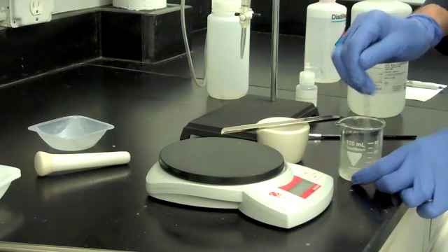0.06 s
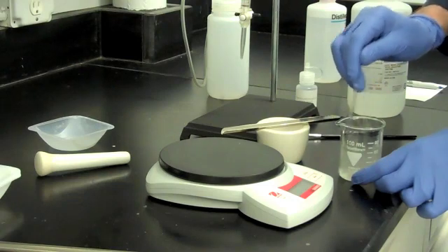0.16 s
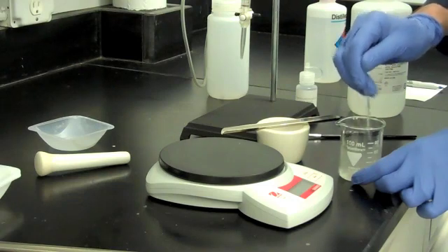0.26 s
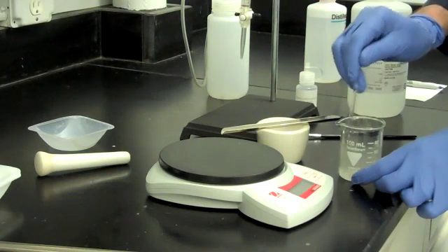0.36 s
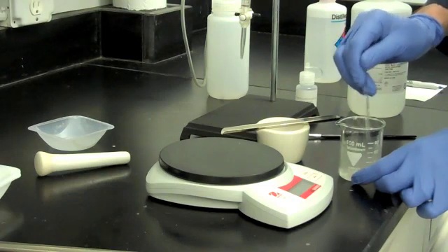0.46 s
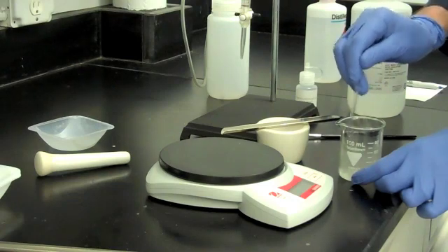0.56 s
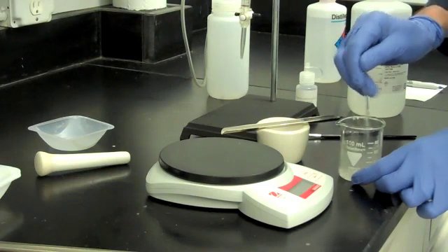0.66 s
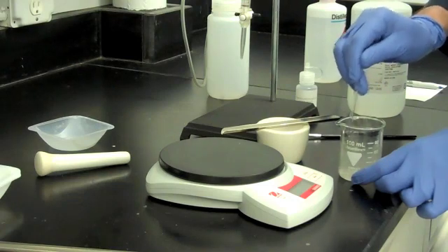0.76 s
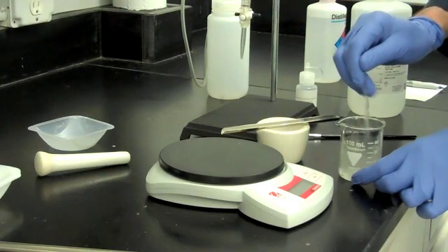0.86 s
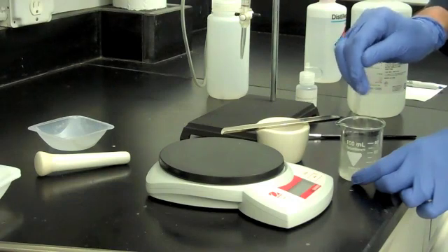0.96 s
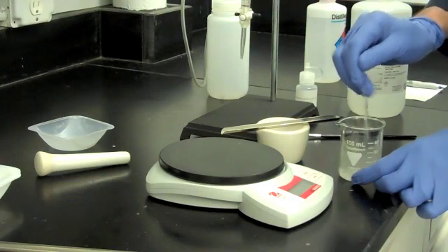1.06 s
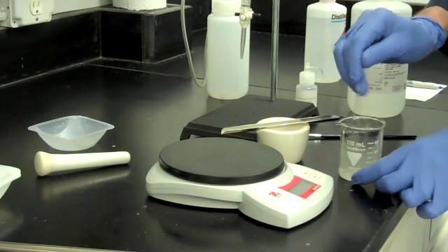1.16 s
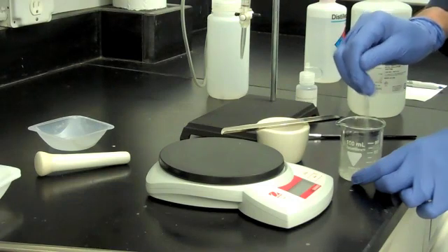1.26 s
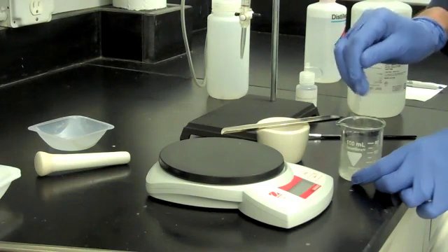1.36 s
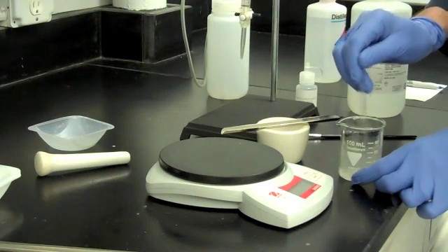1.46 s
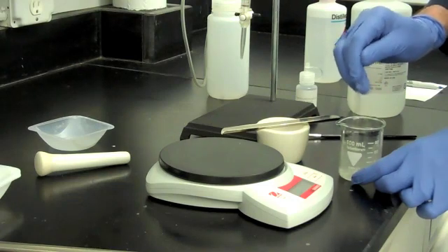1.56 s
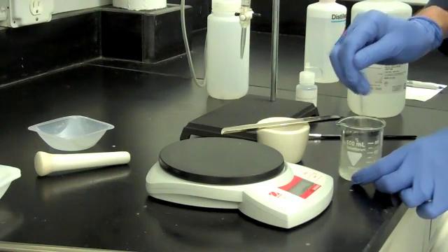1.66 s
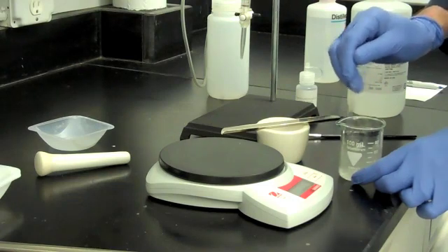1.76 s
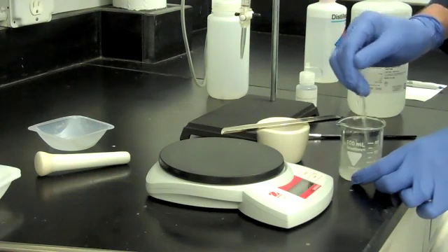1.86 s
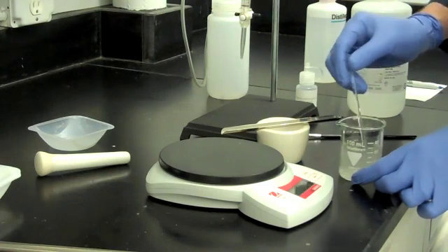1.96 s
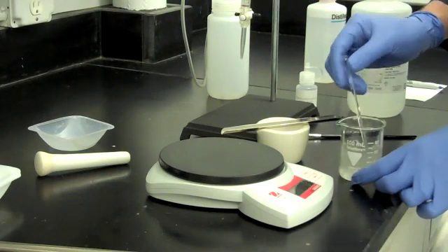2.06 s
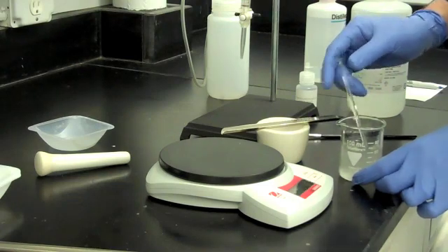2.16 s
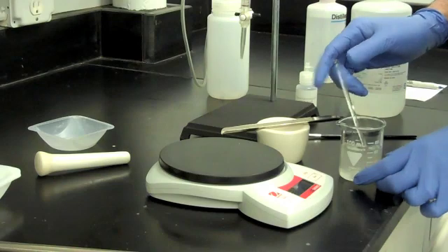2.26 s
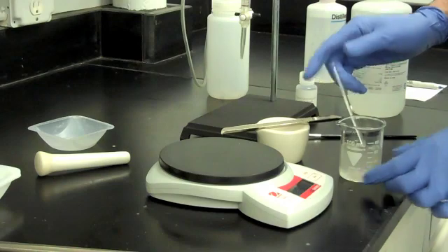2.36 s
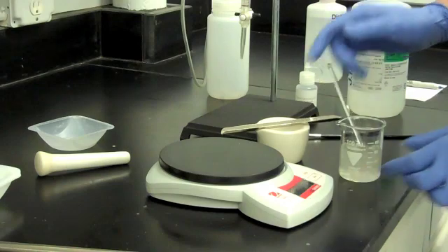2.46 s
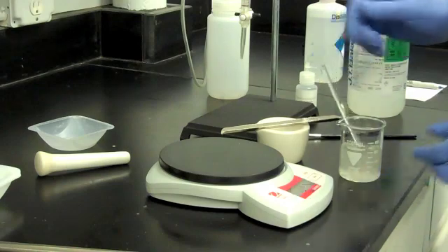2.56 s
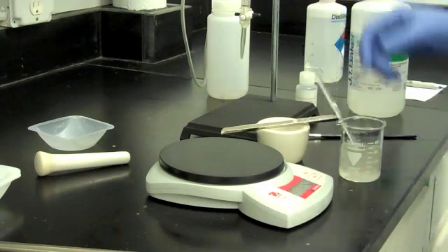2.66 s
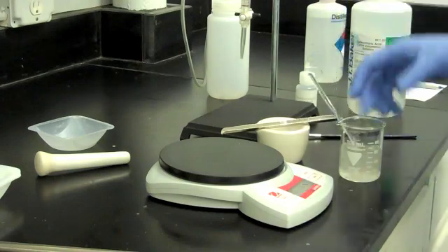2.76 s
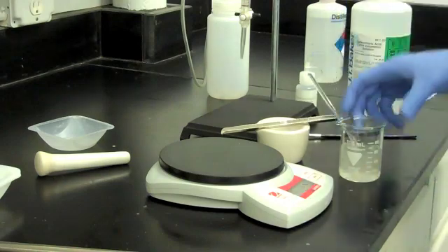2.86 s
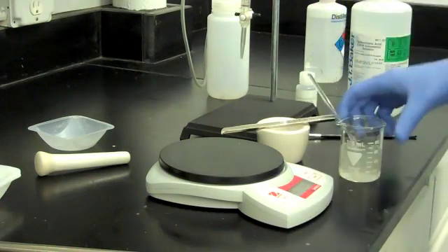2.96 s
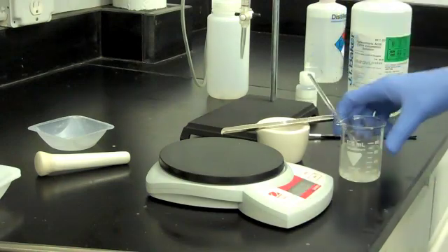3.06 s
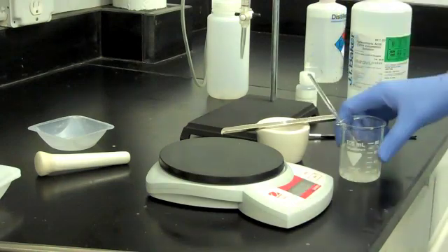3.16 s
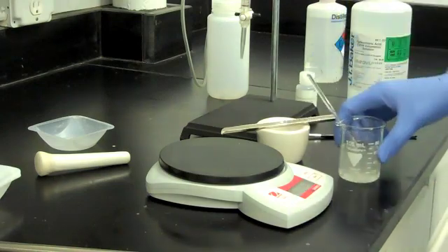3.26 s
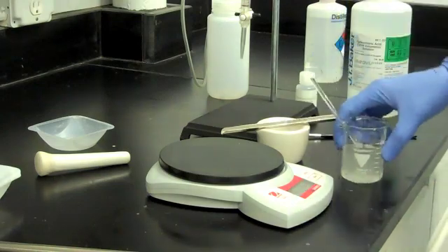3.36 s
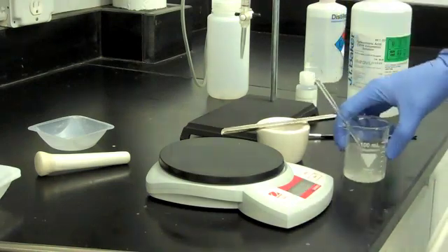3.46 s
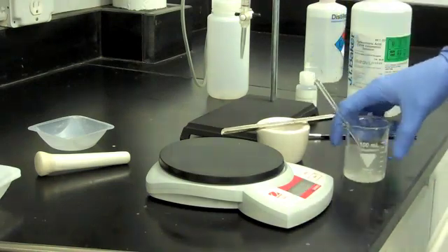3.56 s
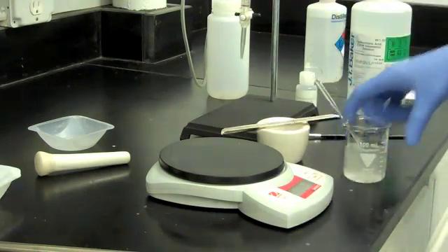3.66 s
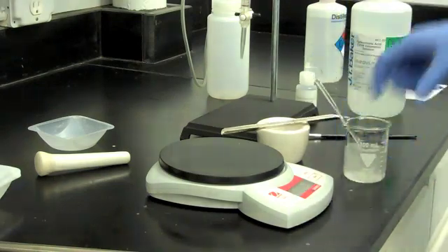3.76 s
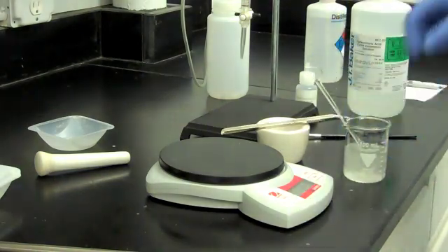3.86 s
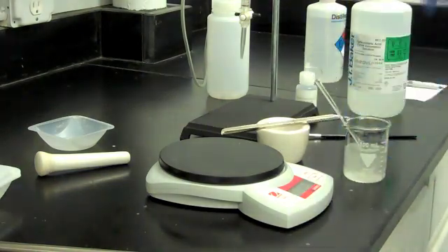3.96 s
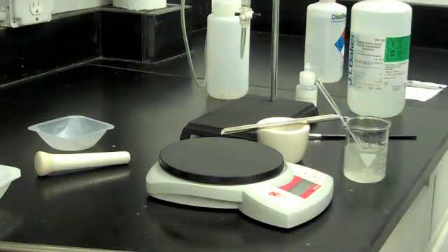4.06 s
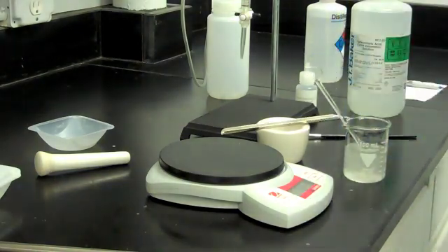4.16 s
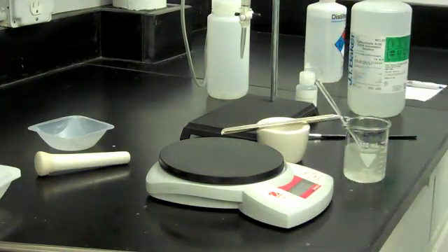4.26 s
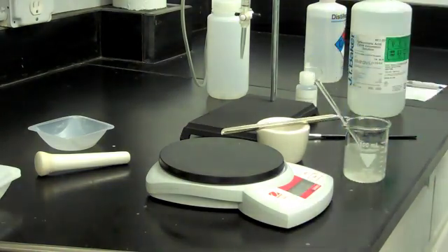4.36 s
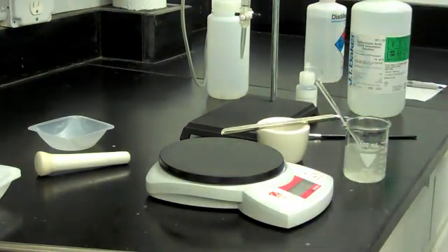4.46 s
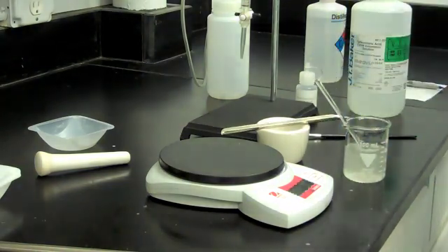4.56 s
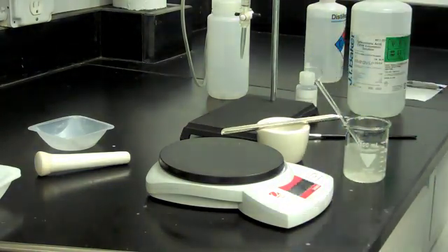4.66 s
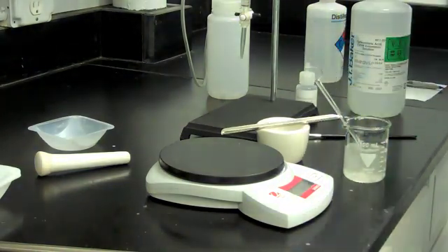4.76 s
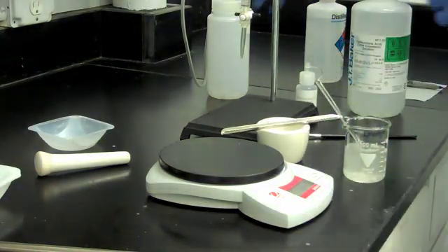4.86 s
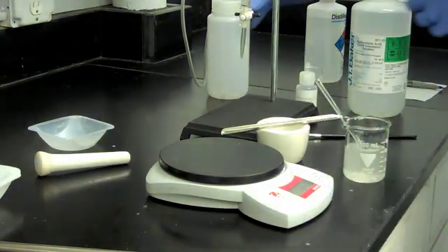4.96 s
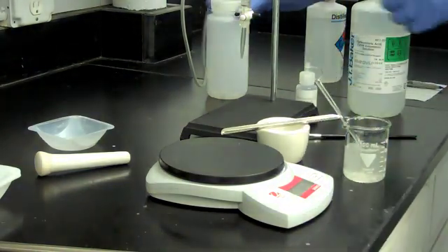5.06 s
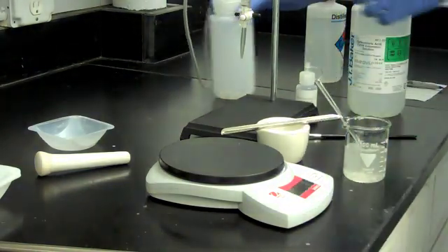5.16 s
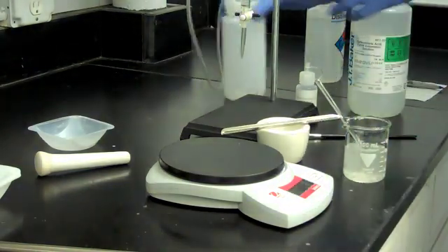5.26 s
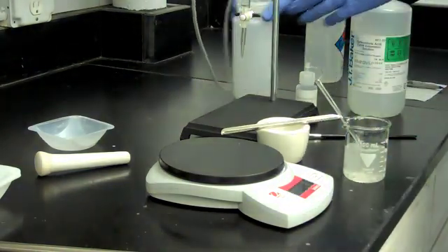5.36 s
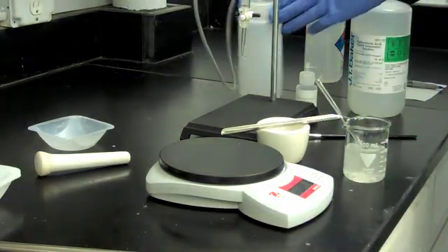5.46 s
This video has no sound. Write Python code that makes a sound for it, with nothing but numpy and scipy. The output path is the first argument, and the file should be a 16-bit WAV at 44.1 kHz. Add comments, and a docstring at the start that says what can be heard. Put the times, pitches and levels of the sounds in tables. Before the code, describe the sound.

In a small hard lab room, a thin glass rod stirs liquid in a beaker with quick uneven bright clinks, a clear ringing note, small slaps and bubble blips. After about two seconds it is released, clattering briefly and sliding on the rim. The beaker is nudged over the bench, then sleeve rustle and a dull plastic bump follow. Ventilation hums steadily. The close stereo pickup leans left for the glass highs.

```python
"""Bright, quick clinks come first: a glass rod stirs liquid in a beaker, then is let go and slides on the rim.
Each clink is a noise tick and crack plus decaying sine modes; the beaker's own note sings on underneath.
Liquid slaps and bubbles; sticking and slipping glass excites the same modes as it scrapes and slides.
Later the beaker is nudged across the bench, a sleeve rustles as the arm reaches out, and a plastic bottle
is bumped, all in shaped noise. Ventilation noise and motor tones hum throughout in a small hard room."""
import sys
import numpy as np
from scipy import signal
from scipy.fft import rfft, irfft, next_fast_len
from scipy.io import wavfile
from scipy.ndimage import uniform_filter1d, map_coordinates

SR = 44100
rng = np.random.default_rng(int(sys.argv[2]) if len(sys.argv) > 2 else 0)


def to_wav(sig):
    """Store sig (one row per channel, or 1-D mono) as 16-bit WAV at the path in sys.argv[1].

    Samples outside -1..1 are clipped; the rate is SR.
    """
    pcm = np.clip(np.atleast_2d(sig), -1, 1) * 32767
    pcm = np.round(pcm).astype(np.int16)
    wavfile.write(sys.argv[1], SR, pcm.T)  # frames by channels


N = 243076
T = np.arange(N) / SR
HALF_S = T[:SR // 2]   # time axis of one short sound


def from_db(db):
    """Turn decibels into an amplitude factor."""
    return 10 ** (np.asarray(db) / 20)


def rms_one(x):
    """Scale a signal to rms 1."""
    return x / np.sqrt(np.mean(x ** 2) + 1e-20)


def at_hz(points, hz):
    """Read a spectrum on a log-frequency axis."""
    points = np.array(points)
    return np.interp(np.log(np.maximum(hz, 1)), np.log(points[:, 0]), points[:, 1])


def dying(t, t60):
    """Exponential decay that falls 60 dB in t60 seconds."""
    return np.exp(-np.log(1000) * t / t60)


def add(out, s, sound):
    """Mix a sound into out from time s on."""
    start = max(round(s * SR), 0)
    out[..., start:start + sound.shape[-1]] += sound[..., :N - start]


def wobble(rate, size=N):
    """Smooth random movement with about rate turns a second; spread about 1."""
    knots = rng.standard_normal(4096)
    return map_coordinates(knots, [T[:size] * rate], order=3, mode="wrap")


# Stereo width of all noise: [f/Hz, left-right likeness from -1 (opposed) to 1 (mono)]
STEREO_LIKENESS = [(30, 0.2), (130, 0.95), (600, 1), (1400, 0.2), (3000, 0.33), (7000, -0.21),
                   (15000, -0.18)]


def noise(spectrum, size=N):
    """Stereo noise of a given colour at rms 1, its left-right likeness set by frequency."""
    padded = next_fast_len(size)
    hz = np.fft.rfftfreq(padded, 1 / SR)
    mid, side = rfft(rng.standard_normal((2, padded)))
    alike = np.clip(at_hz(STEREO_LIKENESS, hz), -1, 1)
    both = np.sqrt(1 + alike) * mid + np.sqrt(1 - alike) * side * [[1], [-1]]
    coloured = irfft(both * from_db(at_hz(spectrum, hz)), padded)
    return rms_one(coloured[:, :size])


def tinted(x, spectrum, sides=1):
    """Apply a smooth gain curve; sides gives its share in each channel."""
    size = next_fast_len(x.shape[-1] + 256)
    curve_db = at_hz(spectrum, np.fft.rfftfreq(size, 1 / SR))
    gain = from_db(curve_db * np.array(sides))
    return irfft(rfft(x, size) * gain, size)[:, :x.shape[-1]]


def strokes(rows, attack_s, release_t60):
    """Level of rubbing strokes: each swells, holds for the rest of its length and dies away."""
    power = 0
    for s, length, db in rows:
        swell = np.sin(np.pi / 2 * np.clip((T - s) / attack_s, 0, 1))
        release = dying(np.clip(T - s - length, 0, 1), release_t60)
        power = power + (from_db(db) * swell * release) ** 2
    return np.sqrt(power)


def friction(spectrum, pressure, grain_db):
    """Rubbing noise, roughened by catches a few milliseconds long."""
    catches = rms_one(uniform_filter1d(rng.standard_normal(N), size=160))
    return noise(spectrum) * pressure * rms_one(from_db(grain_db * catches))


def ringing(modes, colour, ring, tuning=1, ear_lag_s=.00006, scatter=2.23):
    """One blow on a set of modes; the contact point gives each a chance strength and phase."""
    t, out = HALF_S, 0
    for hz, db, t60 in modes:
        chance_db = 2.2 * rng.standard_normal()
        gain = from_db(db + at_hz(colour, hz) + chance_db)
        # each blow's modes land slightly off pitch, by chance
        pitch = tuning * hz * (1 + 0.0011 * rng.standard_normal())
        # the right side hears it later, with a random phase scatter (rad)
        late = 2 * np.pi * hz * ear_lag_s + scatter * rng.standard_normal()
        turn = rng.uniform(0, 2 * np.pi) - np.array([[0], [late]])
        wave = 2 * np.pi * pitch * t
        swing = gain * dying(t, t60 * ring)
        out = out + np.cos(turn) * (swing * np.sin(wave)) + np.sin(turn) * (swing * np.cos(wave))
    return out


def sliding(pressure, modes, colour, ring, slips_per_s, tuning=1):
    """Glass on glass sticks and slips; the tiny slips excite the modes."""
    slips = (rng.random(N) < slips_per_s / SR) * rng.standard_normal(N)
    body = ringing(modes, colour, ring, tuning=tuning)
    body = body * (1 - np.exp(-HALF_S / .001))
    body = body / np.sqrt(np.sum(body ** 2) / 2)
    return signal.fftconvolve([rms_one(slips) * pressure], body, axes=1)[:, :N]


def lab(x, near_db=-11.5, near_t60=0.059, tail_db=-10.0, tail_t60=0.51, top_t60=0.19, split_hz=8500):
    """Quick reflections off bench and bottles, then a room tail whose top dies first."""
    t = T[:SR]
    flat = [(100, 0), (16000, 0)]
    near = noise(flat, size=SR) * dying(t, near_t60) * (t > .002)
    diffuse = noise(flat, size=SR) * (1 - np.exp(-t / 0.0051))
    low = signal.sosfilt(signal.butter(4, split_hz, "low", fs=SR, output="sos"), diffuse)
    top = signal.sosfilt(signal.butter(4, split_hz, "high", fs=SR, output="sos"), diffuse)
    tail = low * dying(t, tail_t60) + top * dying(t, top_t60)
    echoes = from_db(near_db) * rms_one(near) + from_db(tail_db) * rms_one(tail)
    return x + signal.fftconvolve(x, echoes / np.sqrt(SR), axes=1)[:, :N]


# Colour of the broad air noise: [f/Hz, relative level/dB]
AIR_COLOUR = [(15, -45.5), (25, -14), (58, -18), (102, -8.5), (188, 1.5), (407, -6), (441, -2), (477, -0.5),
              (622, -8), (730, -4), (903, -4), (1120, -7), (3150, -17.5), (7760, -21), (14300, -29)]
# Colour of the thin hiss: [f/Hz, relative level/dB]
HISS_COLOUR = [(3000, -42), (5500, -6), (7600, 7), (8800, -2), (11000, -8.5), (11900, 3.5), (12600, -22),
               (15000, -19)]
# Top-end roll-off of air and hiss: [f/Hz, level/dB]
AIR_ROLLOFF = [(14100, 0), (14700, -30)]
# Motor tones before their waver: [f/Hz, rms level/dB]
MOTOR_TONES = [(120, -79), (199.2, -67.5), (398.4, -69), (479.5, -61.5), (600, -69.5), (720.5, -68),
               (839.8, -64), (959, -67)]


def ventilation(air_db=-54.0, hiss_db=-63.0, waver=0.34):
    """Steady air noise, a thin hiss and motor tones that drift slightly in level and phase."""
    air = from_db(air_db) * noise(AIR_COLOUR)
    hiss = from_db(hiss_db) * noise(HISS_COLOUR)
    out = tinted(air + hiss, AIR_ROLLOFF)
    for hz, db in MOTOR_TONES:
        swell, phase = waver * signal.resample(rng.standard_normal((2, 24)), N, axis=1)
        tone = np.sin(2 * np.pi * (hz * T + rng.random()) + phase)
        out += np.sqrt(2) * from_db(db) * (1 + swell) * tone
    return out


# Strokes of sleeve and glove: [t/s, length/s, rub level/dB, swish level/dB]
RUSTLE_STROKES = [(4.391, 0.041, -52.5, -42.5), (4.828, 0.04, -41.5, -54.5), (4.952, 0.061, -45.5, -48.5),
                  (4.999, 0.077, -44.5, -46), (5.294, 0.044, -52, -44.5), (5.447, 0.045, -59, -48)]
# Colour of the darker cloth rub: [f/Hz, relative level/dB]
RUB_COLOUR = [(250, -14), (600, -3.5), (1500, -0.5), (1950, -0.5), (2400, -1.5), (3300, -2), (5000, -11.5),
              (12000, -47)]
# Colour of the brighter cloth swish: [f/Hz, relative level/dB]
SWISH_COLOUR = [(1000, -38), (2800, -8.5), (5200, -3.5), (6400, -1.5), (7500, 2.5), (9000, -6),
                (12000, -13.5), (15000, -30)]
# Glass base dragged on the bench: [t/s, length/s, level/dB]
BASE_DRAGS = [(3.13, 0.36, -57.5), (3.32, 0.072, -51), (3.5, 0.073, -51)]
# Colour of dragged glass: [f/Hz, relative level/dB]
BASE_DRAG_COLOUR = [(300, -22), (900, 7.5), (1500, 9), (2800, -7), (4500, -21), (8000, -35), (14000, -31)]
# Dull bumps on the bench: [t/s, level/dB, t60/s]
BENCH_BUMPS = [(3.515, -44, 0.14), (4.453, -40.5, 0.11), (5.254, -31, 0.12), (5.295, -44.5, 0.39)]
# Colour of a bump: [f/Hz, relative level/dB]
BUMP_COLOUR = [(30, -45), (70, -23), (170, 5.5), (330, 2.5), (600, 7.5), (920, 2.5), (1300, -7.5),
               (3000, -12.5), (7000, -21), (14000, -37)]


def handling(reach_start_s=3.93, reach_rise_s=0.91, reach_rub_db=-57, reach_swish_db=-53.5):
    """Cloth and dragged glass as friction noise, soft bumps as short decaying noise."""
    # the cloth's whisper grows as the arm reaches out, then stays
    reach = np.clip((T - reach_start_s) / reach_rise_s, 0, 1)
    start, length, rub_db, swish_db = np.transpose(RUSTLE_STROKES)
    rub = strokes(zip(start, length, rub_db), attack_s=0.032, release_t60=0.11)
    swish = strokes(zip(start, length, swish_db), attack_s=0.032, release_t60=0.11)
    out = friction(RUB_COLOUR, np.hypot(rub, reach * from_db(reach_rub_db)), grain_db=1.0)
    out += friction(SWISH_COLOUR, np.hypot(swish, reach * from_db(reach_swish_db)), grain_db=1.0)
    drag = strokes(BASE_DRAGS, attack_s=0.11, release_t60=0.3)
    out += friction(BASE_DRAG_COLOUR, drag, grain_db=3.0)
    t = HALF_S
    soft = np.sin(np.pi / 2 * np.minimum(t / .006, 1)) ** 2
    for s, db, t60 in BENCH_BUMPS:
        add(out, s, from_db(db) * noise(BUMP_COLOUR, size=len(t)) * soft * dying(t, t60))
    return out


# Faint squeaks of wet glass and rubber glove: [t/s, centre f/Hz, level/dB, length/s]
GLOVE_SQUEAKS = [(2.71, 2584, -48.5, 0.11), (4.401, 4820, -44, 0.05), (4.414, 5580, -40.5, .04),
                 (4.48, 4850, -58.5, 0.32), (4.6, 3720, -62, .17), (4.965, 1886, -42.5, 0.071)]


def squeaks(jitter=0.063):
    """Rubber slips at an unsteady rate, heard as short tones of jittering pitch."""
    out = np.zeros((2, N))
    for s, hz, db, length in GLOVE_SQUEAKS:
        swell = np.hanning(round(length * SR))
        pitch = hz * (1 + jitter * wobble(391, size=len(swell)))
        add(out, s, from_db(db) * swell * np.sin(2 * np.pi * np.cumsum(pitch) / SR))
    return out


# Liquid slapping the wall: [t/s, level/dB, t60/s]
WALL_SLAPS = [(.23, -47, 0.28), (.306, -34.5, 0.3), (.45, -42, 0.31), (1.372, -42, 0.047),
              (1.413, -41, 0.32), (1.645, -44.5, 0.75), (1.869, -40.5, 0.48), (3.517, -36, 0.096)]
# Colour of a slap: [f/Hz, relative level/dB]
SLAP_COLOUR = [(250, -17.5), (600, -1), (900, 0), (1250, 5), (1550, -1), (1950, 1.5), (2600, -3),
               (5000, -44)]
# Bubbles pulled under by the rod: [t/s, starting f/Hz, level/dB, t60/s]
RISING_BUBBLES = [(.299, 2073, -26.5, 0.064), (.307, 1876, -22.5, 0.085), (.696, 2140, -33, 0.057),
                  (1.463, 1980, -21, 0.028), (1.478, 1850, -31, 0.057)]


def liquid(rise=0.93):
    """Slaps of liquid, and bubbles whose pitch rises as they near the surface."""
    out, t = np.zeros((2, N)), HALF_S
    for s, db, t60 in WALL_SLAPS:
        slap = noise(SLAP_COLOUR, size=len(t)) * dying(t, t60)
        add(out, s, from_db(db) * slap * (1 - np.exp(-t / 0.0012)))
    for s, hz, db, t60 in RISING_BUBBLES:
        # pitch climbs by 2 * rise of its start per second
        tone = np.sin(2 * np.pi * hz * t * (1 + rise * t))
        add(out, s, from_db(db) * tone * dying(t, t60) * (1 - np.exp(-t / 0.0067)))
    return out


# Once let go, the rod lies deeper in the liquid and rings flatter
LET_GO_S, SUNK_PITCH = 2.2, .985   # s, pitch factor
# Loose rod sliding round the rim: [t/s, length/s, level/dB]
RIM_SLIDES = [(2.33, 0.027, -44.5), (2.53, 0.14, -48.5), (2.69, 0.1, -50.5), (3.35, 0.032, -56)]
# Rod modes, before each use tunes, colours and shortens them: [f/Hz, level/dB, t60/s]
ROD_MODES = [(997, -12, 0.31), (2594, -1, 0.053), (3020, -15.5, 0.6), (3080, -15.5, 0.99), (5060, -4, 0.17),
             (5174, -5.5, 0.33), (6400, -5, 0.35), (6660, -3, 0.16), (8000, -3.5, 0.15), (8400, -5, 0.23),
             (8435, -3, .15)]
# The beaker's low body resonance under the sliding rod: [f/Hz, relative level/dB]
RIM_BODY_COLOUR = [(500, -29), (800, -21), (950, -6.5), (1100, -19), (1400, -28), (1900, -18), (2400, -30),
                   (5500, -27.5), (9000, -48)]


def rim_slide(body_db=-2.5, grain_db=0.5):
    """The loose rod judders round the rim, ringing briefly and shaking the beaker's body."""
    pressure = strokes(RIM_SLIDES, attack_s=0.032, release_t60=.3)
    # f/Hz, level/dB
    colour = [(1000, 5.0), (2600, 17.5), (3000, 10.5), (5000, -2.0), (6400, 5.5), (8000, 10.0)]
    rod = sliding(pressure, ROD_MODES, colour, ring=0.081, slips_per_s=550, tuning=SUNK_PITCH)
    return rod + friction(RIM_BODY_COLOUR, pressure * from_db(body_db), grain_db)


# Rod tip scraping the wall while it stirs: [t/s, length/s, level/dB]
TIP_SCRAPES = [(.17, 0.12, -50.5), (.3, 0.26, -53), (1.39, 0.073, -47.5), (1.86, 0.071, -57)]
# Beaker wall modes, before each use colours and shortens them: [f/Hz, level/dB, t60/s]
WALL_MODES = [(1794, -19.5, 0.27), (3245, -13, .12), (3376, -31, 0.88), (3437, -19.5, 0.24),
              (3750, -24.5, 0.17), (5122, -17.5, 0.18), (5543, -8.5, 0.11), (5670, -6, 0.057),
              (6254, -8.5, 0.3), (6190, -15, 0.1), (6710, -0.5, 0.13), (6910, -8, 0.13), (7070, -17, 0.13),
              (7500, -2, 0.11), (7530, -12, .08), (7830, -8, 0.051), (8090, -0.5, .06), (8050, -5, 0.1),
              (8520, -7, 0.16), (9150, -8.5, 0.11), (10300, -21, 0.14), (10710, -24, 0.34),
              (12780, -16, 0.059), (12640, -22.5, 0.22), (13800, -19, .06)]


def wall_scrape():
    """Between clinks the rod's tip drags along the wall, its slips ringing the wall modes."""
    pressure = strokes(TIP_SCRAPES, attack_s=0.035, release_t60=0.29)
    colour = [(3000, 11), (8000, -6), (11000, 2.0)]   # f/Hz, level/dB
    return sliding(pressure, WALL_MODES, colour, ring=0.15, slips_per_s=110)


# The swirl climbs the wall and flattens the beaker's note; it settles when the stirring ends
STILL_NOTE_HZ, SWIRL_SAG_HZ, SWIRL_WAVER_HZ = 2444, 29.55, 9.24
WAVERS_PER_S, STIR_END_S, SETTLE_S = 19, 2.2, .22
FLUTTER_DB = 3.5   # quick unevenness of the note's level
# Glass contacts, played by beaker_note and clinks:
# [t/s, level/dB, knock level/dB, middle level/dB, top level/dB, beaker note level/dB]
GLASS_CONTACTS = [(0.0471, -14.5, 3.5, 9.5, 3.5, -40.5), (.305, -12.5, -8, -4, 7.5, -38.5),
                  (0.4457, -12, 3, 1.5, 0.5, -33), (.514, -21.5, 3, -9, 9, -66),
                  (.6042, -17, -5.5, -7, 9.5, -49.5), (.668, -32.5, 3, -1, 10, -71),
                  (0.7093, -17, -5, -6.5, 7.5, -41.5), (0.795, -20, -5, -3.5, 9, -70),
                  (0.8204, -21.5, 5, 5.5, -23, -43.5), (0.911, -19.5, -1.5, -11, 8.5, -51),
                  (.979, -22.5, -14, -1, 10.5, -71), (1.031, -17, 9.5, 7, 3, -33.5),
                  (1.1188, -27, 7, -4, 7, -61), (1.1701, -23, -6.5, 3, 14, -64),
                  (1.298, -17, -3, -5.5, 10.5, -40), (1.372, -31.5, 16, -11, 2, -49),
                  (1.4815, -22.5, -6.5, -6, 9, -42.5), (1.5843, -18.5, -13, -5, 4, -63),
                  (1.6397, -13, 1.5, 3, -1, -40.5), (1.691, -14.5, 2.5, 5, 11.5, -36.5),
                  (1.867, -23.5, 8, 8.5, 4, -45), (2.291, -30, 5, 7, 6, -41),
                  (2.3036, -25, 0, -15, 4, -34.5), (2.3118, -30, -10, 14, -10, -29),
                  (2.32, -32.5, 10, 7, 3, -37), (3.513, -33.5, 13.5, -1, -9, -63)]


def beaker_note(t60=0.66, build_s=0.00065, rest_s=2.385, rest_db=-6.5):
    """The rim's oval mode rings on from blow to blow, quieter once the rod comes to rest on it."""
    power, t = np.zeros(N), T[:SR]
    for s, *_, note_db in GLASS_CONTACTS:
        level = from_db(note_db) * dying(t, t60) * (1 - np.exp(-t / build_s))
        add(power, s, level ** 2)
    swirl = np.exp(-np.maximum(T - STIR_END_S, 0) / SETTLE_S)
    hz = STILL_NOTE_HZ - swirl * (SWIRL_SAG_HZ + SWIRL_WAVER_HZ * wobble(WAVERS_PER_S))
    damped_db = rest_db * np.clip((T - rest_s) / 0.0046, 0, 1)
    gain = from_db(damped_db + FLUTTER_DB * wobble(58))
    return gain * np.sqrt(power) * np.sin(2 * np.pi * np.cumsum(hz) / SR)


def liquid_mode(start_hz=980, end_hz=1130, settle_s=0.0361, t60=0.43):
    """A low, liquid-loaded mode that glides up as the wave from a blow falls back."""
    t = HALF_S
    glide_hz = end_hz + (start_hz - end_hz) * np.exp(-t / settle_s)
    hz = glide_hz * (1 + 0.033 * rng.standard_normal())
    ripple = 1 + .6 * wobble(70, size=len(t))
    return ripple * dying(t, t60) * np.sin(2 * np.pi * np.cumsum(hz) / SR)


# Levels of the ringing parts against the strength of the contact (dB)
LIQUID_MODE_DB, WALL_SHARE_DB, HELD_ROD_DB, LOOSE_ROD_DB = -28.5, -5.5, -28.5, 0.5
# The fingers damp the rod, except while the grip is loose, from the last clinks until the beaker is moved
LOOSE_FROM_S, LOOSE_UNTIL_S = 1.8, 3.0
WALL_RING, ROD_RING = 0.34, 0.57   # share of their t60 that wall and rod keep in a contact
ATTACK_S = .0003
# Where the knock, middle, main and top colours of a contact act: [f/Hz]
CONTACT_BANDS = [1850, 4740, 7450, 12900]
# Colour of a contact's crack: [f/Hz, relative level/dB]
CRACK_COLOUR = [(150, -44), (400, -23.5), (750, -22.5), (1100, -6.5), (1500, -11), (2100, -7.5),
                (2800, -10.5), (4300, -15), (6300, 0.5), (8300, 4), (9700, -10.5), (11400, -24.5),
                (13000, -5), (14000, -35.5), (15200, -54)]
# Balance of the rod's modes before it is let go: [f/Hz, level/dB]
HELD_ROD_COLOUR = [(1000, 0), (3000, -2), (5100, 3), (6500, -3.5), (8300, -1)]
# Balance of the rod's modes once let go: [f/Hz, level/dB]
SUNK_ROD_COLOUR = [(1000, -5.5), (2600, -2), (3000, -8.5), (5100, -13), (6400, -5.5), (8300, -2.5)]


def clinks(crack_db=-4.5, crack_t60=0.066, tick_db=-2.5, tick_t60=0.0013):
    """Each contact is a sharp tick and a short crack, with the ringing of wall, rod and liquid."""
    out, t = np.zeros((2, N)), HALF_S
    fall = from_db(crack_db) * dying(t, crack_t60) + from_db(tick_db) * dying(t, tick_t60)
    attack = 1 - np.exp(-t / ATTACK_S)
    for s, db, knock_db, middle_db, top_db, _ in GLASS_CONTACTS:
        colour = list(zip(CONTACT_BANDS, [knock_db, middle_db, 0, top_db]))
        crack = tinted(noise(CRACK_COLOUR, size=len(t)), colour) * fall
        wall = from_db(WALL_SHARE_DB) * ringing(WALL_MODES, colour, WALL_RING)
        tuning, rod_colour = (SUNK_PITCH, SUNK_ROD_COLOUR) if s > LET_GO_S else (1, HELD_ROD_COLOUR)
        rod_db = LOOSE_ROD_DB if LOOSE_FROM_S < s < LOOSE_UNTIL_S else HELD_ROD_DB
        rod = from_db(rod_db) * ringing(ROD_MODES, rod_colour, ROD_RING, tuning=tuning)
        low = from_db(LIQUID_MODE_DB + knock_db / 2) * liquid_mode()
        add(out, s, from_db(db) * (crack + wall + rod + low) * attack)
    return out


# Stereo balance of the glass and liquid: [f/Hz, left minus right level/dB]
GLASS_PAN = [(400, -1.5), (750, -2.5), (1300, 0), (2400, 8.5), (4400, 7.5), (8000, 11), (14000, 4)]
# Stereo balance of handling and air: [f/Hz, left minus right level/dB]
ROOM_PAN = [(100, -1), (400, 4), (700, -3), (1300, 2), (2400, 6), (8000, 8), (15000, -6)]


def scene():
    """The glass leans left in its upper range; the handling and the air sit more evenly."""
    halves = [[.5], [-.5]]   # half of each balance raises the left, half lowers the right
    background = from_db(-1.0) * lab(handling() + squeaks()) + ventilation()
    glass = lab(clinks() + wall_scrape() + rim_slide() + liquid()) + beaker_note()
    return tinted(glass, GLASS_PAN, halves) + tinted(background, ROOM_PAN, halves)


def record(dry):
    """The sharpest peaks are rounded and the top is cut."""
    rounded = 1.3 * np.tanh(dry / 1.3)
    cutoff_hz = 15800
    return signal.sosfilt(signal.ellip(8, .1, 80, cutoff_hz, fs=SR, output="sos"), rounded)


dry = scene()
out = record(dry)
to_wav(out)
```